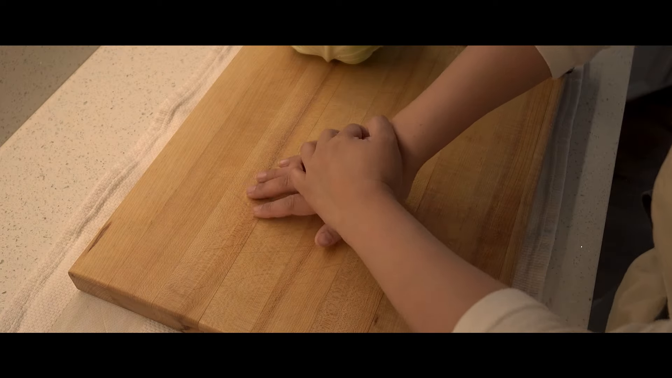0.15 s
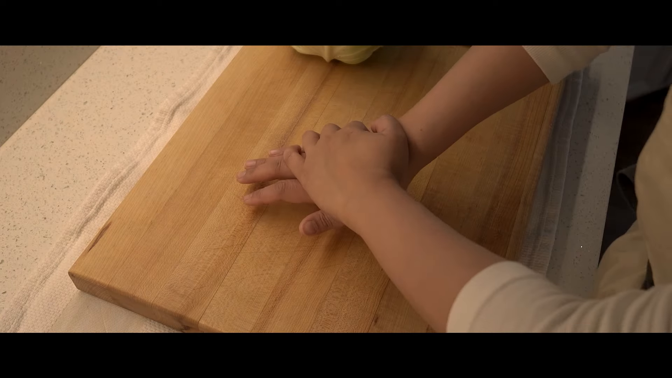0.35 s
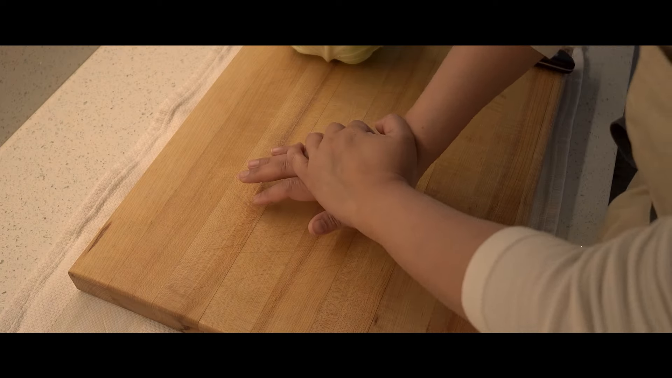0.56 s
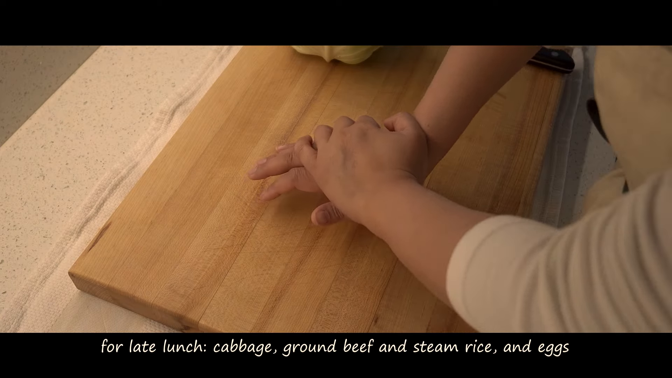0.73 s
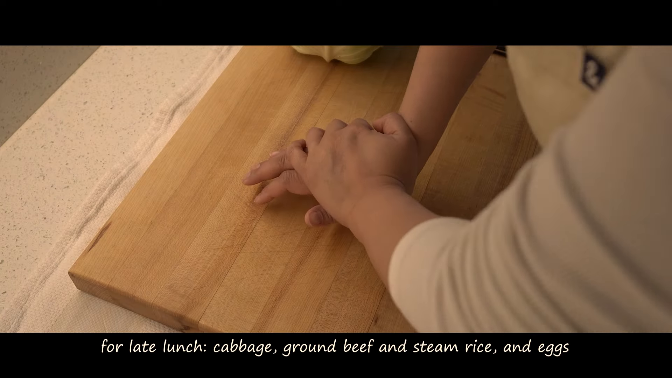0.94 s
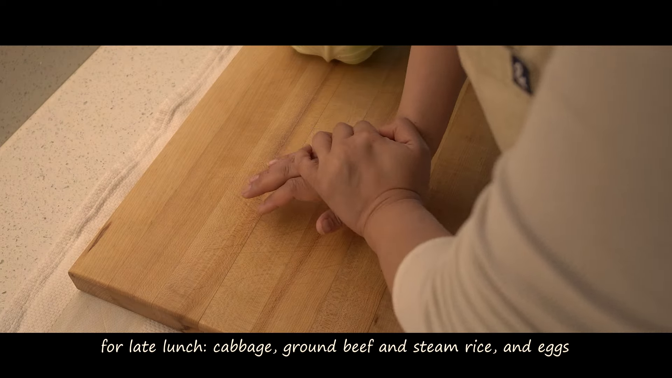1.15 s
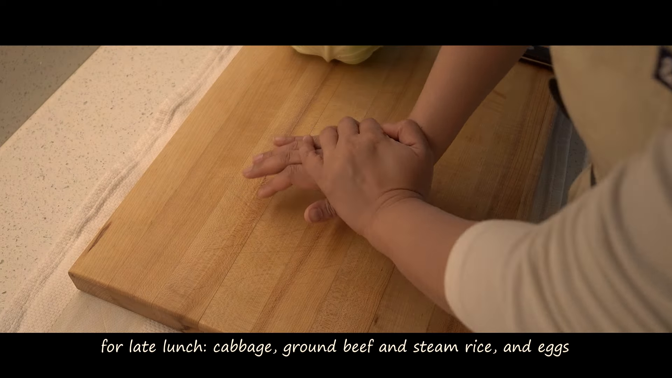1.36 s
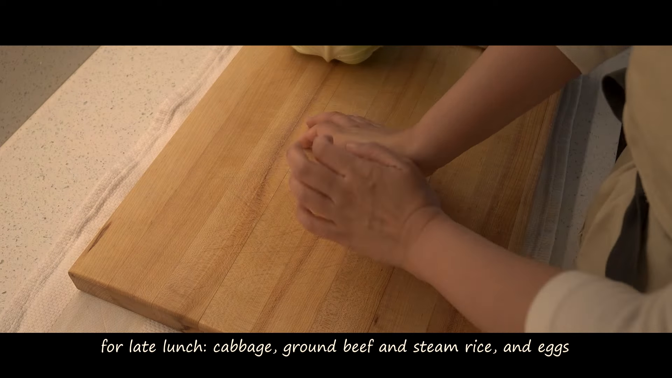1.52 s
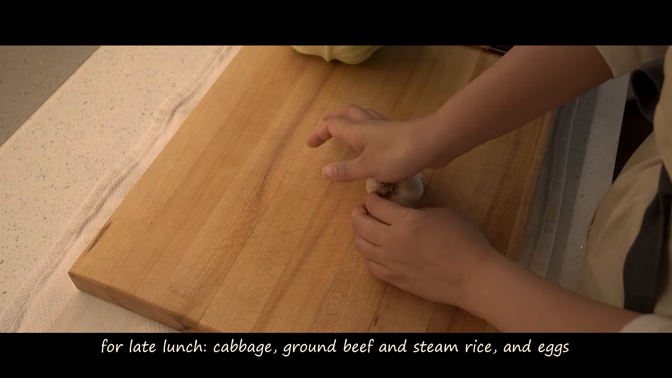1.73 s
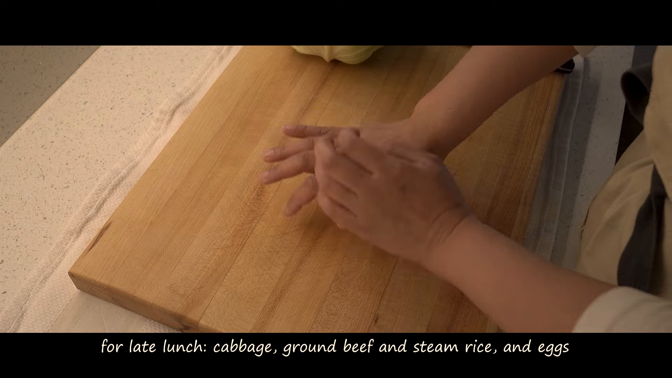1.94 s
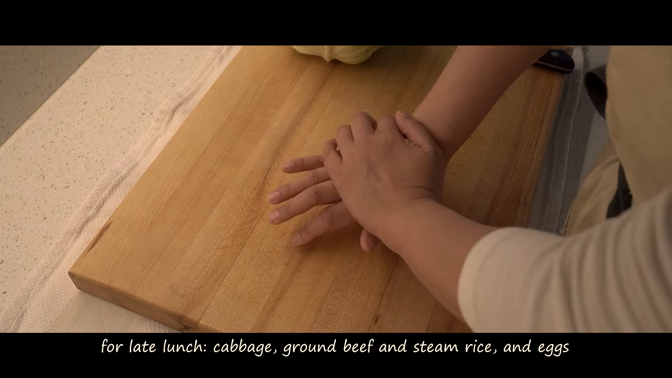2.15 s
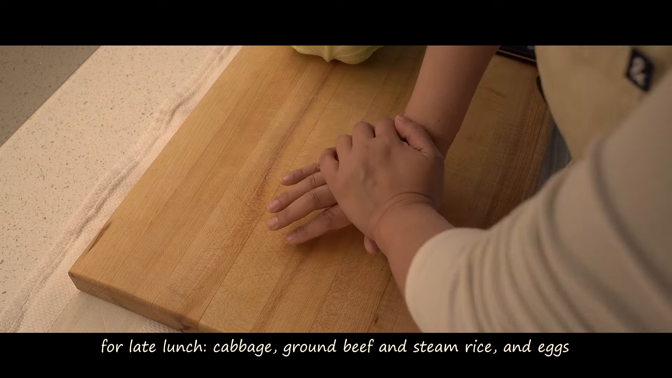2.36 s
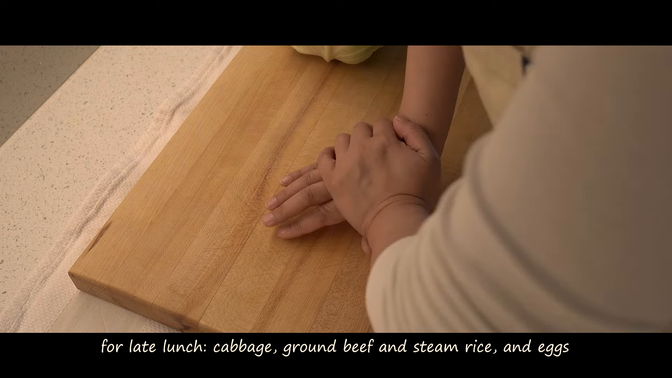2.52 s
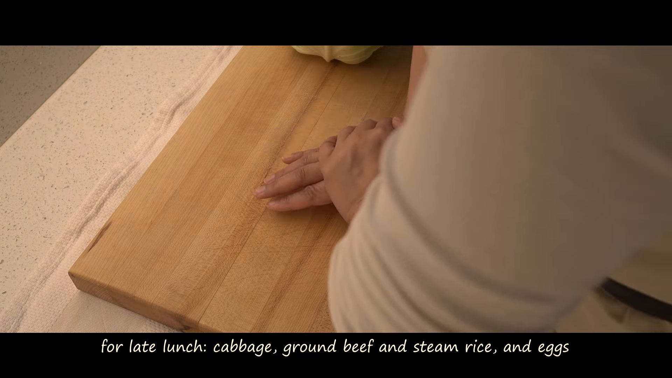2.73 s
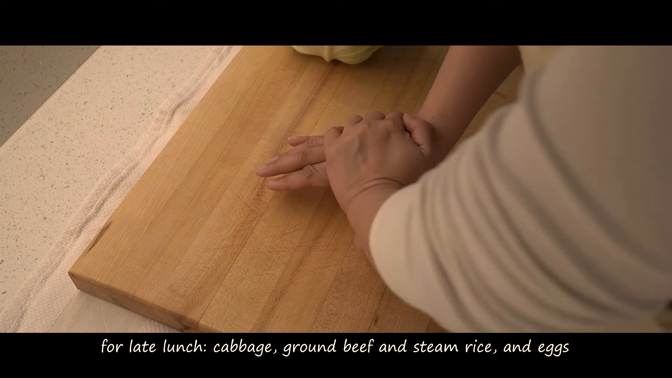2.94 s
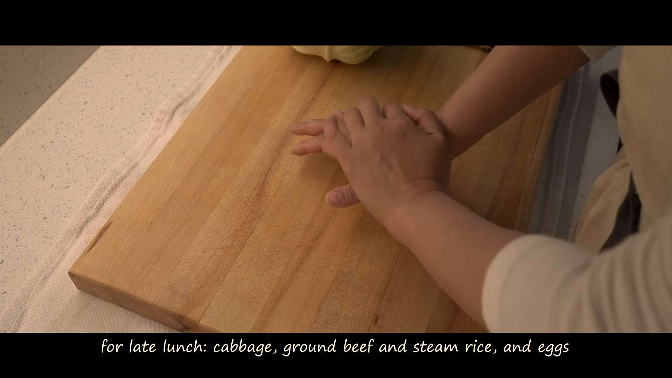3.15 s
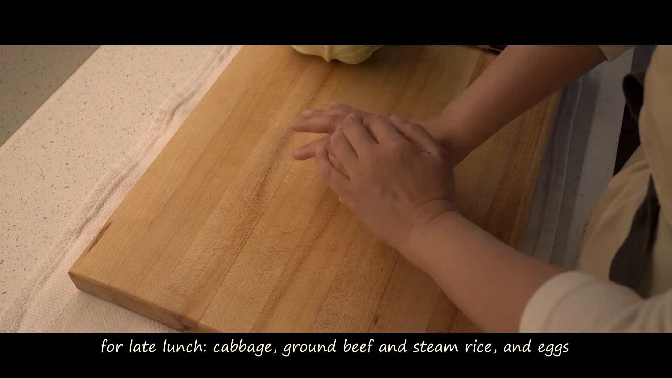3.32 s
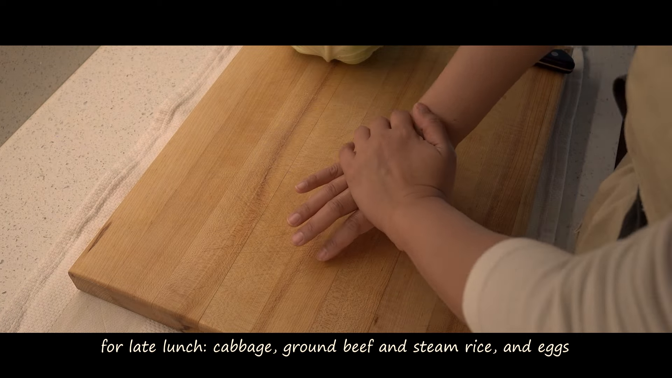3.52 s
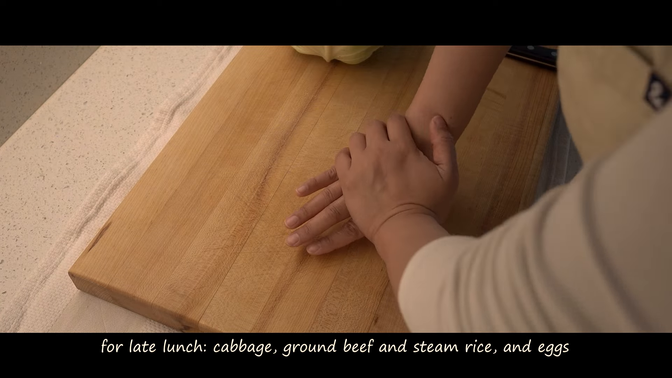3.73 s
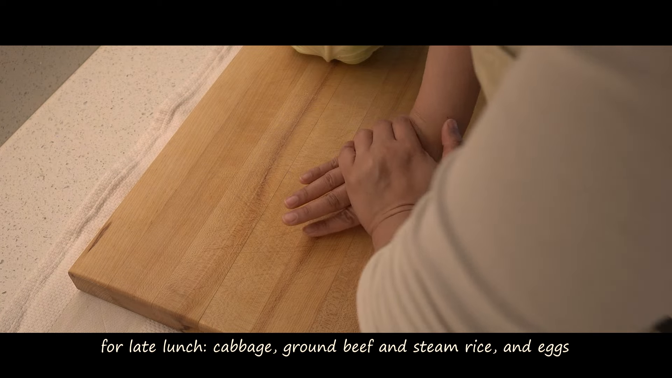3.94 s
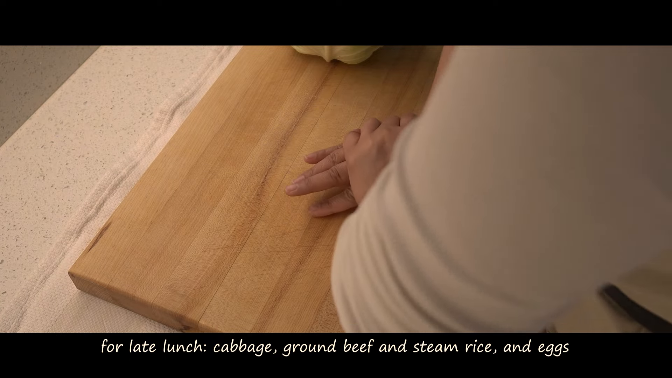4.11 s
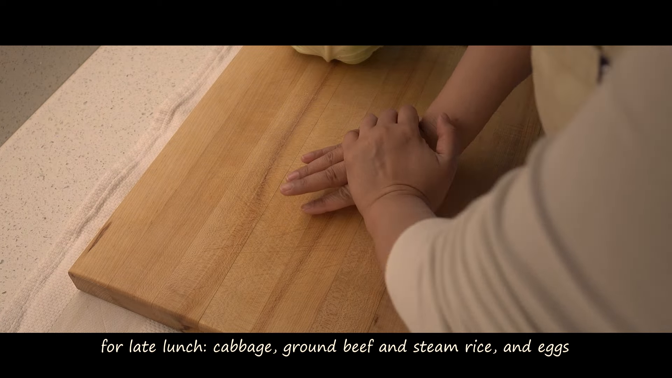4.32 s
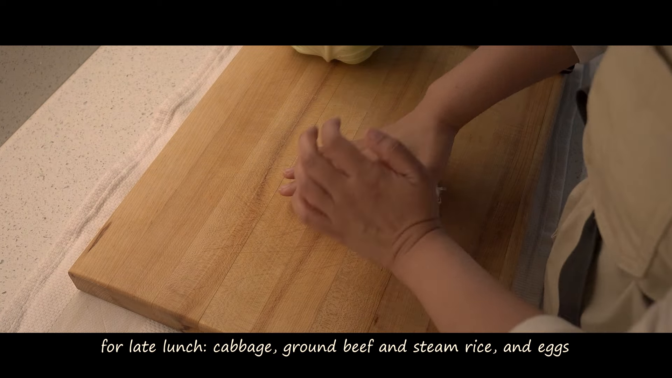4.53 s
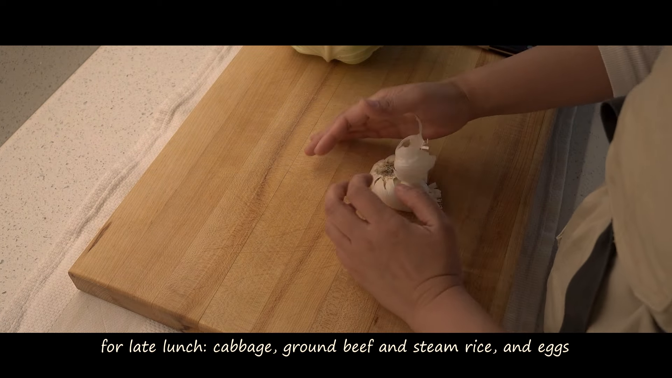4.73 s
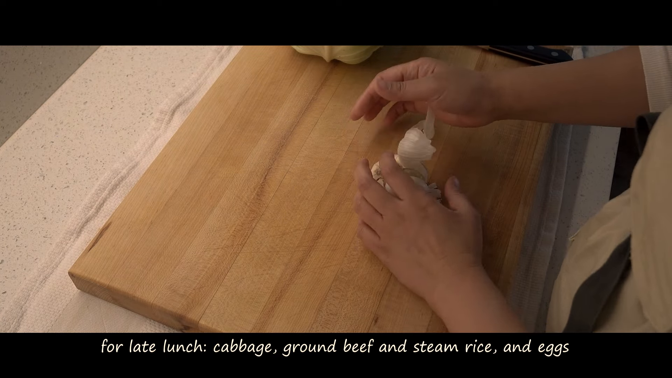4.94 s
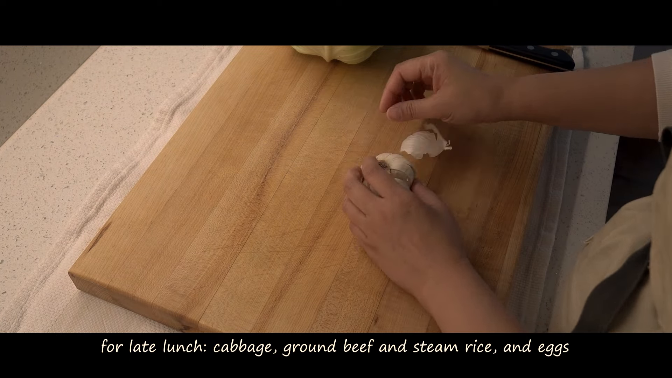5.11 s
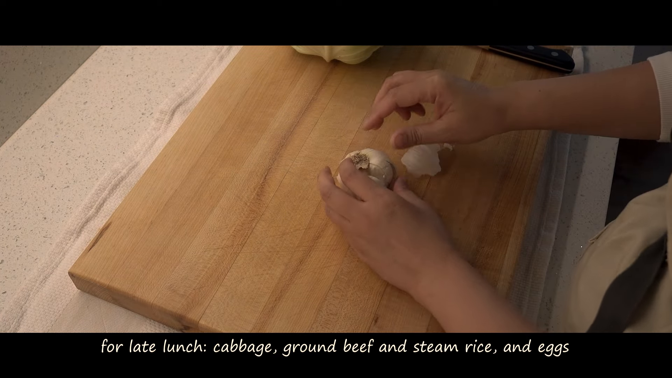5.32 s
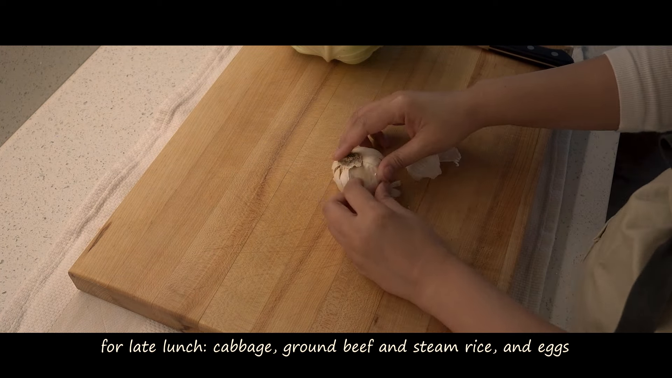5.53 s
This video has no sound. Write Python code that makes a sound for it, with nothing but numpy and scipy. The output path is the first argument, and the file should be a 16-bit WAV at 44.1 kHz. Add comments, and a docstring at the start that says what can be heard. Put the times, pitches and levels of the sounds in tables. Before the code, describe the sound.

Close, dry cracking and papery rustling as a garlic bulb is pressed apart on a board, heard almost entirely on the left.

```python
"""Breaking a garlic bulb

Two hands lean on a garlic bulb on a wooden board, three times over, then pull the loose skins away.
Snaps are noise cracks with the rings of flake and bulb; rustle is noise gated by random creases.
Slips are gliding tones, drags resonant noise; a short room tail and steady air lie behind.
A close microphone in a small kitchen hears it, almost wholly in the left channel."""
import sys
import numpy as np
from scipy import signal
from scipy.fft import rfft, irfft, next_fast_len
from scipy.io import wavfile
from scipy.ndimage import uniform_filter1d, minimum_filter1d

SR = 44100
rng = np.random.default_rng(int(sys.argv[2]) if len(sys.argv) > 2 else 0)


def output_pcm(signal):
    """Save a mono or channel-first signal as 16-bit PCM at the path in sys.argv[1].

    Samples are clipped to [-1, 1] before scaling.
    """
    pcm = np.clip(np.atleast_2d(signal).T, -1, 1) * 32767
    wavfile.write(sys.argv[1], SR, np.round(pcm).astype(np.int16))


N = 245637

# steady air spectrum: (frequency [Hz], relative level [dB])
AIR_SPECTRUM = [(20, -7.5), (50, -28), (90, 1), (130, -32.5), (300, -12.5), (430, -11.5), (570, 8),
                (800, 7.5), (1200, 4.5), (2500, -5), (6000, -19), (16000, -39)]
# room decay: (frequency [Hz], t60 [s])
KITCHEN_T60 = [(300, 0.17), (2000, 0.27), (6000, 0.17), (15000, 0.12)]
# resonances of the bulb on the board: (centre [Hz], width [Hz], gain [dB])
BODY_MODES = [(779, 102, -2.5), (1830, 11, -23), (3140, 170, -16.5), (4210, 620, -7.5)]
# hands and bulb drag over the wood: (middle [s], Gaussian sigma [s], level [dB], pitch [Hz], width [Hz])
DRAG_EVENTS = [(0.597, 0.029, -49, 840, 400), (1.58, 0.083, -42, 1420, 820), (1.69, 0.017, -50, 1390, 800),
               (3.604, 0.031, -41.5, 1447, 386), (5.512, 0.032, -65, 85, 25)]
# the bulb slips with a small hollow squeak: (time [s], level [dB], start pitch [Hz], t60 [s],
# rise time constant [s])
SLIP_EVENTS = [(.222, -39, 580, 0.16, 0.0047), (.594, -34, 597, 0.15, 0.0026),
               (0.979, -38, 550, 0.054, 0.0015), (3.716, -28, 570, 0.055, 0.0027)]
# thick husk spectrum: (frequency [Hz], relative level [dB])
HUSK_SPECTRUM = [(30, -26), (150, -29.5), (300, -44.5), (430, -25.5), (580, -12), (1000, -7), (1550, 2),
                 (2600, 1), (4200, 0), (6500, -6), (15000, -29.5)]
# thin skin spectrum: (frequency [Hz], relative level [dB])
SKIN_SPECTRUM = [(30, -41), (1000, -45.5), (3000, -2), (5500, 2.5), (9000, 1.5), (13000, -1), (16000, -8)]
# pushes and rubs of the hands: (full from [s], hold [s], rise [s], fall [s], husk level [dB],
# thin skin over husk [dB], lesser snaps over husk [dB])
HAND_STROKES = [(0, 0.083, .05, 0.066, -36, 2.5, -3), (.25, 0.036, 0.065, .08, -34, 0, -3),
                (.48, 0.057, 0.037, 0.14, -41, 0, -3), (1.04, 0.026, 0.17, 0.26, -35.5, -4, 4),
                (1.19, 0.11, 0.36, 0.083, -34.5, 3, 6), (1.51, 0.075, 0.15, 0.12, -33.5, 3.5, -5),
                (1.69, 0.021, 0.28, 0.11, -37.5, -2, -6), (1.83, 0.0033, 0.12, 0.14, -44, -3, 8),
                (2.055, 0.028, 0.018, 0.25, -35, -4.5, 3.5), (2.2, .03, 0.23, 0.19, -44, -0.5, 3),
                (2.65, 0.062, 0.14, 0.11, -22, -2.5, 0), (2.79, 0.035, .08, 0.25, -21.5, 0, 4),
                (3.08, 0.1, 0.15, 0.27, -29, -4, 4.5), (3.555, 0.075, 0.051, 0.16, -39, 3, 8.5),
                (3.92, 0.08, 0.25, .1, -34.5, -5.5, 11), (4.055, .1, 0.075, .07, -13.5, 0, -6.5),
                (4.21, 0.0073, .04, 0.07, -19, -4.5, -2), (4.41, 0.17, 0.75, 0.53, -35, -4.5, 4),
                (4.71, 0.021, 0.27, 0.19, -45, 13, 8), (5.14, 0.1, 0.12, 0.38, -36.5, 3.5, 5.5),
                (5.33, .1, 0.14, 0.18, -43.5, 3, 3.5), (5.55, .02, 0.15, 0.083, -28, 2, 1)]
# palms rest on the bulb: (from [s], to [s], husk level [dB])
PALM_LEANS = [(0.14, 0.392, -47.5), (.55, 0.752, -55), (0.77, 1.396, -48.5), (2.276, 2.6, -47),
              (3.65, 4.85, -44.5)]
# clearest snaps of the husk: (time [s], relative level [dB], low tint near 800 Hz [dB],
# mid tint at the bulb's hollow pitch [dB], top tint near 11 kHz [dB])
HUSK_SNAPS = [(0.0151, -24.5, -16, -38, -4.5), (0.032, -33, -13, -17, 3), (0.1571, -36, 5, 8, -1),
              (.378, -34.5, 0, -1, 3.5), (0.46, -27, -14, -2, -5), (0.465, -24, -17, -8, -2),
              (0.4865, -22, -22, 1, -4), (.5165, -26.5, -8, -2, -5), (0.721, -34, -30, -3, -10),
              (0.7537, -33, -2, -1, -0.5), (0.9096, -28, -34, -8, -12), (0.9412, -31.5, 0, 24, 3),
              (.98, -22, 6.5, 15, 2), (.9995, -28.5, -12, -8, -8), (1.0344, -20.5, -6, 19, 0),
              (1.044, -12, -21, -17, -0.5), (1.147, -9.5, -8, 3.5, 0.5), (1.1622, -18.5, -24, -15, 0),
              (1.191, -18, -0.5, 12, -3), (1.2046, -7.5, -12, 2, 3.5), (1.2615, -13, -11, -7, 5),
              (1.3914, -36.5, 4.5, 9, -8), (1.43, -34, -8, 14, -5), (1.445, -28.5, -17, 2, 10),
              (1.4677, -24, -10, 2, 2), (1.473, -20.5, -13, -3, -2), (1.522, -18.5, -10, 0, -0.5),
              (2.0803, -22.5, -8, -1, -6.5), (2.1181, -27.5, -6, 10.5, -6), (2.193, -31.5, 0, 13, -5),
              (2.2177, -22.5, -16.5, -2, -8.5), (2.2587, -30.5, -17, -14, -1), (2.4082, -30.5, 1.5, 2, -20),
              (2.5399, -27, -24, -13, -14), (2.5522, -15, -10, -8, 1), (2.5721, -22, -11, -10, 15),
              (2.607, -5, -12, 0, 3.5), (2.631, -8.5, 1.5, 4.5, 8), (2.6655, 1.5, -3.5, 7, -1.5),
              (2.6976, -7, -2, 8, 3.5), (2.7639, -11.5, -3, 5, -5.5), (2.7957, -2.5, -12, 3.5, -4.5),
              (2.8268, -6.5, -10.5, 1, -14), (2.8284, -7.5, -18, -29, -9), (2.8337, -11, -4, 14, -12),
              (2.873, -14, -23, 5, 0), (2.89, -6, -10, 8.5, -1), (2.9345, -20.5, -7, 1, -6),
              (2.973, -25.5, -22, -15, 4), (3.0161, -19, -11, 8.5, -5), (3.056, -10.5, -22, 7.5, -7.5),
              (3.0754, -18, -19, 1, -6), (3.1028, -18.5, -28, -5, -12), (3.1222, -23.5, -7.5, 21.5, -6),
              (3.1344, -21, -21, -7, -12), (3.1707, -23.5, -12, 0, -4), (3.2873, -23.5, -4, 5, 10),
              (3.5268, -34.5, -7, 9, 0), (3.5958, -27, -4, 6, 1), (3.673, -25, -13, 18, -2),
              (3.7157, -15.5, -1.5, -0.5, 0), (3.819, -27.5, -8, 16.5, -12), (3.8458, -30, -25, 17, -1),
              (3.8872, -12, -11, 10.5, 2), (3.907, -25, -12, 7, -6), (3.929, -19.5, -16, 9.5, -5),
              (3.9972, -13, -25, 2, 7), (4.022, -9, -13.5, 10.5, -10), (4.0472, -3.5, -1, 9, -2.5),
              (4.0612, -2.5, -5, 7, 1), (4.0703, -5.5, -22, 5, -10), (4.0837, -1, -13, 7, -5.5),
              (4.0901, -5.5, -16, 7, 0), (4.1452, -9, -5.5, -4, -21), (4.1533, -13.5, -14, 10, -19),
              (4.186, -11, -25, -1, -3), (4.212, -13, -15, 9, -12), (4.3457, -25.5, -25, 7, -5.5),
              (4.4055, -21.5, -18, 8, -15), (4.503, -26, -20, 15, 2), (4.5376, -19, -14, 7, -3.5),
              (4.603, -18.5, -5, -3, 15), (4.7995, -23.5, -9, -19, 4.5), (4.9667, -40, -2, -3, -1),
              (5.0375, -39, -12, -12, -6), (5.316, -24, -9, -18, 4), (5.4236, -26, -10.5, -3, -35)]

SWELL_DB = 24  # gained during a rise, lost during a fall
LEAN_THIN_DB, LEAN_TICK_DB, LEAN_FADE_S = -6, 2, 0.092  # faint creasing under resting palms
FLAKE_HZ, FLAKE_SPREAD_LN = 4586, 0.42  # typical ring of a torn flake, scatter as natural log
# the bulb rings ever higher as it breaks into smaller pieces
BULB_START_HZ, BULB_CLIMB_HZ_PER_S, BULB_SPREAD_LN = 1346, 133.5, 0.086
BULB_DB, BULB_T60_S = -17.5, 0.025
CRACK_T60_S, CRACK_GROWTH_LN_PER_DB = 0.029, 0.013  # t60 at 0 dB; bigger breaks last longer
# lesser snaps: mean rate, level over the effort, scatter of level and tint
TICKS_PER_S, TICK_DB, TICK_SPREAD_DB, TINT_SPREAD_DB = 40, 0.5, 1.5, 4.5
TICK_TINT_DB = np.array([-17, -4.5, -0.5])  # mean low, mid, top
TOP_HZ = 15900  # band limit


def amp(db):
    """Decibels to gain."""
    return 10 ** (np.asarray(db) / 20)


def unit(x):
    """Scale to rms 1."""
    return x / np.sqrt(np.mean(x ** 2) + 1e-20)


def along(points, hz):
    """Interpolate (Hz, value) points on a log frequency axis."""
    f, value = np.transpose(points)
    return np.interp(np.log(hz + 1), np.log(f + 1), value)


def filtered(x, response):
    """Multiply the spectrum of x by a response of frequency."""
    m = next_fast_len(N + SR // 2)
    spectrum = rfft(x, m) * response(np.fft.rfftfreq(m, 1 / SR))
    return irfft(spectrum, m)[..., :N]


def coloured(x, points):
    """Causal minimum-phase filter of unit power, shaped by (Hz, dB) points."""
    m = 2 * next_fast_len(len(x) + SR // 50)
    magnitude = unit(amp(along(points, np.fft.rfftfreq(m, 1 / SR))))
    # folding the cepstrum forward makes the filter causal
    cepstrum = irfft(np.log(magnitude))
    cepstrum[1:m // 2] *= 2
    cepstrum[m // 2 + 1:] = 0
    return irfft(rfft(x, m) * np.exp(rfft(cepstrum)))[:len(x)]


def resonance(hz, centre_hz, width_hz):
    """Complex response of a damped mode with unit peak."""
    damping = 1j * hz * width_hz
    return damping / (centre_hz * centre_hz - hz * hz + damping)


def add(track, time_s, sound):
    """Mix a sound in at a time."""
    start = max(0, round(time_s * SR))
    part = track[start:start + len(sound)]
    part += sound[:len(part)]


def compressed(x, knee_db, slope, hold_samples):
    """The gain of each channel dips just ahead of its loud peaks and holds."""
    needed = (1 + (x / amp(knee_db)) ** 2) ** (-slope / 2)
    held = minimum_filter1d(needed, hold_samples, axis=1, origin=hold_samples // 2 - SR // 300)
    return x * uniform_filter1d(held, SR // 160, axis=1)


def air():
    """Steady coloured noise of the room."""
    return amp(-55.0) * coloured(rng.standard_normal(N), AIR_SPECTRUM)


def kitchen(x):
    """Short diffuse room tail whose treble dies first."""
    hz, t, bins = signal.stft(rng.standard_normal(SR // 3), SR, nperseg=256)
    decay = amp(-60 * t / along(KITCHEN_T60, hz)[:, None])
    tail = signal.istft(bins * decay, SR, nperseg=256)[1]
    delayed = np.pad(tail, (SR // 200, 0))
    return signal.fftconvolve(x, delayed / np.linalg.norm(tail))[:N]


def body(x):
    """Modes of the bulb on the board add to the direct sound."""
    return filtered(x, lambda hz: 1 + sum(amp(db) * resonance(hz, centre_hz, width_hz)
                                          for centre_hz, width_hz, db in BODY_MODES))


def drags():
    """Friction noise swells and fades in one resonance of the board."""
    out, t = np.zeros(N), np.arange(N) / SR
    for middle_s, sigma_s, db, pitch_hz, width_hz in DRAG_EVENTS:
        friction = filtered(rng.standard_normal(N), lambda hz: resonance(hz, pitch_hz, width_hz) ** 2)
        envelope = np.exp(-((t - middle_s) / sigma_s) ** 2 / 2)
        out += amp(db) * envelope * unit(friction)
    return out


def slips(glide_per_s=1.36, roughness=0.07):
    """A slip rings briefly and climbs in pitch as the pressure grows."""
    out, t = np.zeros(N), np.arange(SR // 6) / SR
    for time_s, db, start_hz, t60_s, rise_s in SLIP_EVENTS:
        grip = 1 + roughness * unit(uniform_filter1d(rng.standard_normal(len(t)), size=120))
        tone = np.sin(2 * np.pi * start_hz * t * (1 + glide_per_s * t))
        envelope = amp(db - 60 * t / t60_s) * (1 - np.exp(-t / rise_s))
        add(out, time_s, envelope * grip * tone)
    return out


def swell(start_s, hold_s, rise_s, fall_s):
    """Power envelope that climbs and sinks evenly in dB around a hold."""
    t = np.arange(N) / SR - start_s
    before = np.maximum(-t, 0) / rise_s
    after = np.maximum(t - hold_s, 0) / fall_s
    return amp(-SWELL_DB * (before + after)) ** 2


def handling():
    """Sum the powers of all hand moves into husk, skin and lesser-snap gains over time."""
    moves = HAND_STROKES + [(from_s, to_s - from_s, LEAN_FADE_S, LEAN_FADE_S, db, LEAN_THIN_DB, LEAN_TICK_DB)
                            for from_s, to_s, db in PALM_LEANS]
    power = np.zeros((3, N))
    for start_s, hold_s, rise_s, fall_s, db, thin_db, tick_db in moves:
        levels_db = [[db], [db + thin_db], [db + tick_db]]
        power += amp(levels_db) ** 2 * swell(start_s, hold_s, rise_s, fall_s)
    return np.sqrt(power)


def crinkle(creases_per_s, spread_db, t60_s, rub_db):
    """Countless tiny creases give way at random, over the smooth hiss of sliding skin."""
    sizes_db = spread_db * np.minimum(rng.standard_normal(N), 2)
    creases = (rng.random(N) < creases_per_s / SR) * amp(sizes_db) ** 2
    t = np.arange(SR // 40) / SR
    power = np.abs(signal.fftconvolve(creases, amp(-60 * t / t60_s) ** 2)[:N])
    envelope = np.sqrt(power / power.mean() + amp(rub_db) ** 2)
    return unit(rng.standard_normal(N) * envelope)


def rustle(husk_gain, skin_gain, husk_db=-1.84, skin_db=-0.32):
    """Thick husk crunches low and thin outer skin crinkles high; many creases sound in both."""
    shared = crinkle(creases_per_s=220, spread_db=6.5, t60_s=.008, rub_db=-6)
    thick = crinkle(creases_per_s=350, spread_db=7.5, t60_s=.017, rub_db=-2.5)
    thin = crinkle(creases_per_s=900, spread_db=3.5, t60_s=.004, rub_db=-2)
    husk = unit(coloured(shared + thick, HUSK_SPECTRUM))
    skin = unit(coloured(shared + thin, SKIN_SPECTRUM))
    return amp(husk_db) * husk_gain * husk + amp(skin_db) * skin_gain * skin


def snap(time_s, db, low_db, mid_db, top_db, spike_t60_s=0.0019, spike_db=6, tail_t60_s=0.092, tail_db=-13,
         ring_t60_s=0.06, ring_db=-12, rise_s=0.00023, thud_db=-41, thud_lag=0.6):
    """A fracture: sharp crack, faint thud, rings of flake and hollow bulb, scatter off hands and board."""
    t = np.arange(SR // 16) / SR
    onset = 1 - np.exp(-t / rise_s)
    crack_t60_s = CRACK_T60_S * np.exp(CRACK_GROWTH_LN_PER_DB * db)
    decay = amp(spike_db - 60 * t / spike_t60_s)
    decay += amp(-60 * t / crack_t60_s)
    decay += amp(tail_db - 60 * t / tail_t60_s)
    bulb_hz = BULB_START_HZ + BULB_CLIMB_HZ_PER_S * time_s
    # the thud grows less than the crack
    colour = [(330, thud_db - thud_lag * db), (440, low_db - 26.5), (570, low_db), (1000, low_db),
              (bulb_hz, mid_db - 1), (2700, mid_db / 2 - 1),
              (3600, 1.5), (6000, -.76), (9500, top_db + 3.0), (15500, top_db - 3.5)]
    crack = coloured(rng.standard_normal(len(t)) * decay * onset, colour)
    spreads = np.array([FLAKE_SPREAD_LN, BULB_SPREAD_LN])
    flake, hollow = np.exp(spreads * rng.standard_normal(2))
    ring = amp(ring_db - 60 * t / ring_t60_s) * np.sin(2 * np.pi * FLAKE_HZ * flake * t)
    ring += amp(BULB_DB + mid_db - 60 * t / BULB_T60_S) * np.sin(2 * np.pi * bulb_hz * hollow * t)
    sound = crack + ring * onset ** 2
    return amp(db) * sound / np.std(sound[:SR // 280])  # level set by the first few ms


def ticks(effort):
    """Lesser snaps at random moments, as strong as the hands' effort allows."""
    out = np.zeros(N)
    chance = rng.random((N // 256, 2))
    scatter = np.clip(rng.standard_normal((len(chance), 4)), -2, 2)
    probability = TICKS_PER_S * N / SR / len(chance)
    for (when, luck), (size, *tint) in zip(chance, scatter):
        if luck < probability:
            time_s = when * N / SR
            effort_db = 20 * np.log10(effort[int(when * N)] + 1e-9)
            db = effort_db + TICK_DB + TICK_SPREAD_DB * size
            add(out, time_s, snap(time_s, db, *(TICK_TINT_DB + TINT_SPREAD_DB * np.array(tint))))
    return out


def snaps(level_db=1.0):
    """The husk breaks as the cloves part."""
    out = np.zeros(N)
    for time_s, db, low_db, mid_db, top_db in HUSK_SNAPS:
        add(out, time_s, snap(time_s, db + level_db, low_db, mid_db, top_db))
    return out


def scene():
    """Garlic on its board, room tail and air; the right channel gets a faint copy and faint noise."""
    husk_gain, skin_gain, tick_gain = handling()
    breaking = rustle(husk_gain, skin_gain) + ticks(tick_gain) + snaps()
    garlic = drags() + slips() + body(breaking)
    left = amp(4.5) * (air() + amp(-14.0) * kitchen(garlic) + garlic)
    right = amp(-24.5) * left + amp(-92) * rng.standard_normal(N)
    return np.array([left, right])


def record(dry):
    """A gentle compressor, a fast limiter for the hardest cracks, then the band limit."""
    even = compressed(dry, knee_db=-19, slope=0.18, hold_samples=SR // 16)
    safe = compressed(even, knee_db=0.5, slope=0.6, hold_samples=SR // 110)
    return filtered(safe, lambda hz: hz < TOP_HZ)


dry = scene()
out = record(dry)
output_pcm(out)
```